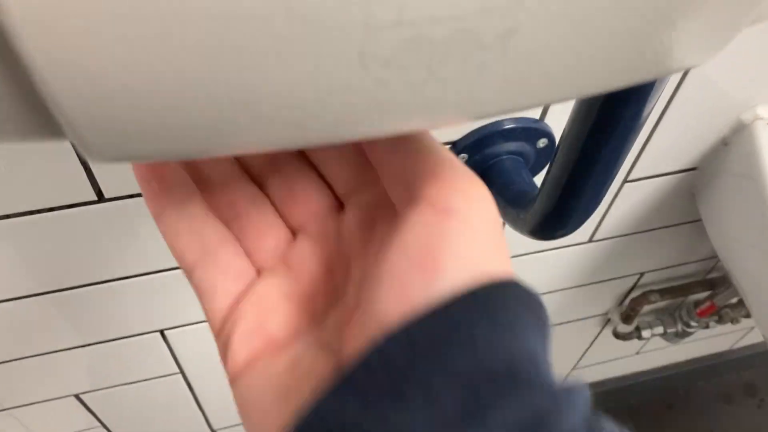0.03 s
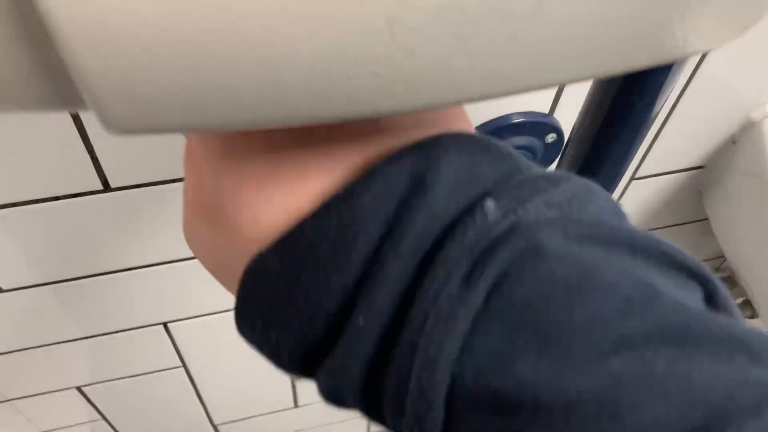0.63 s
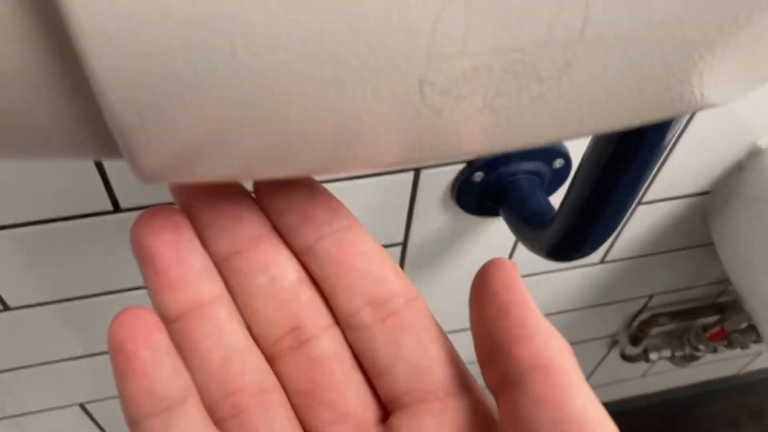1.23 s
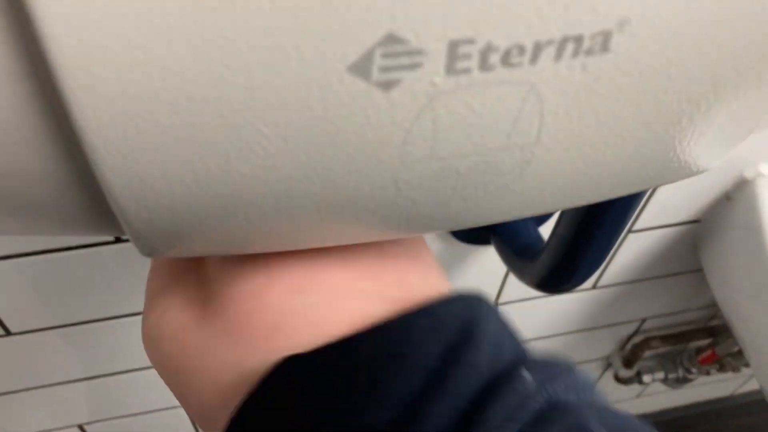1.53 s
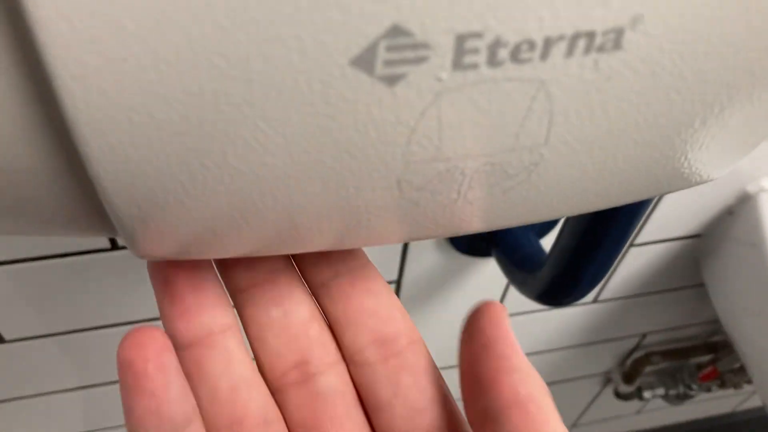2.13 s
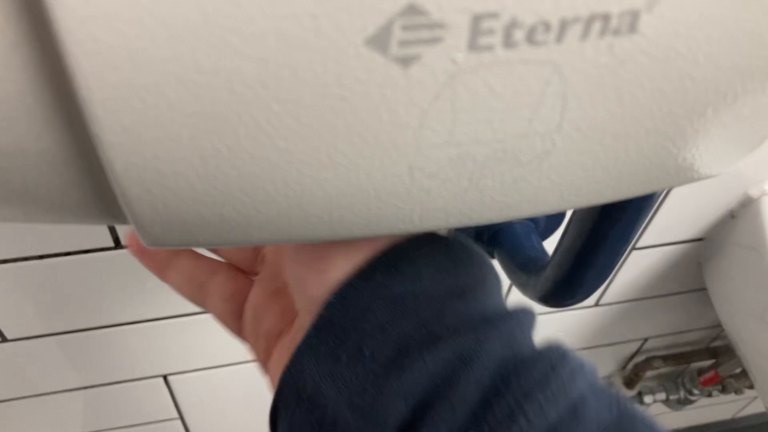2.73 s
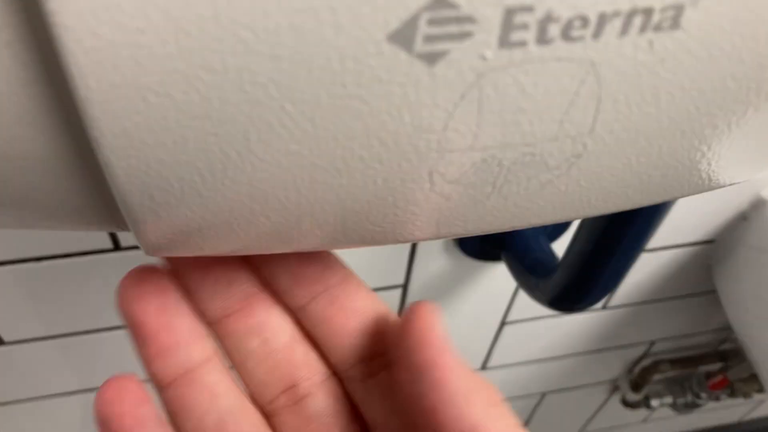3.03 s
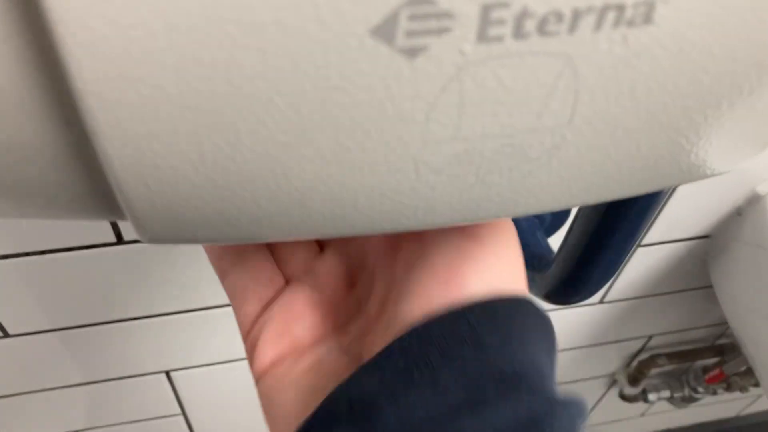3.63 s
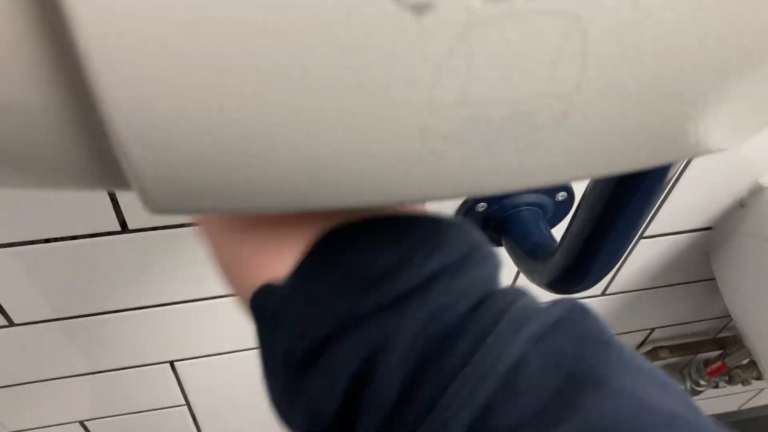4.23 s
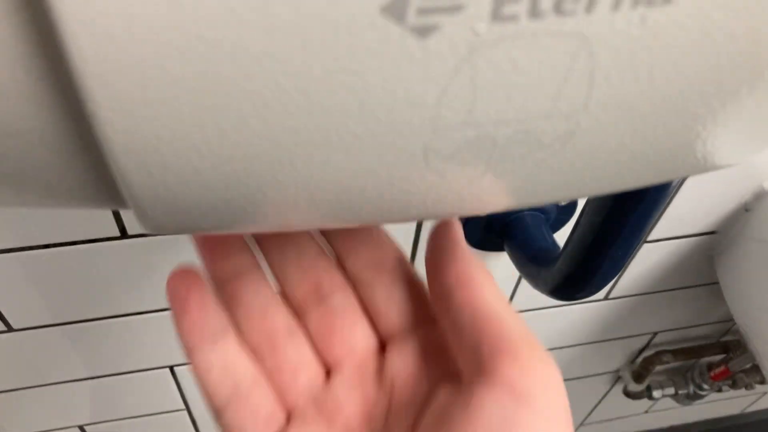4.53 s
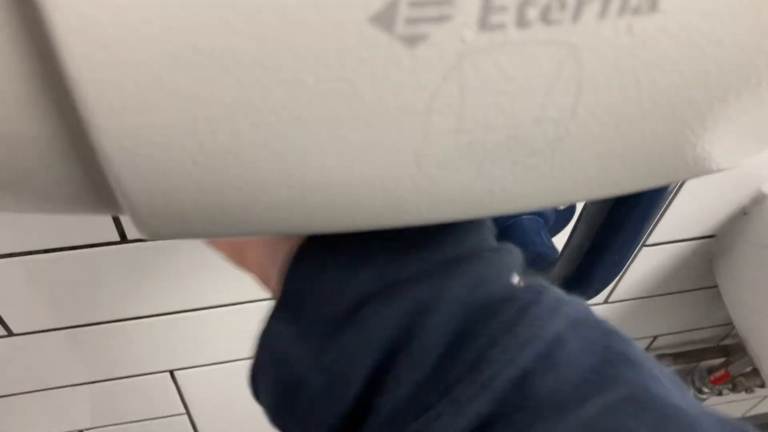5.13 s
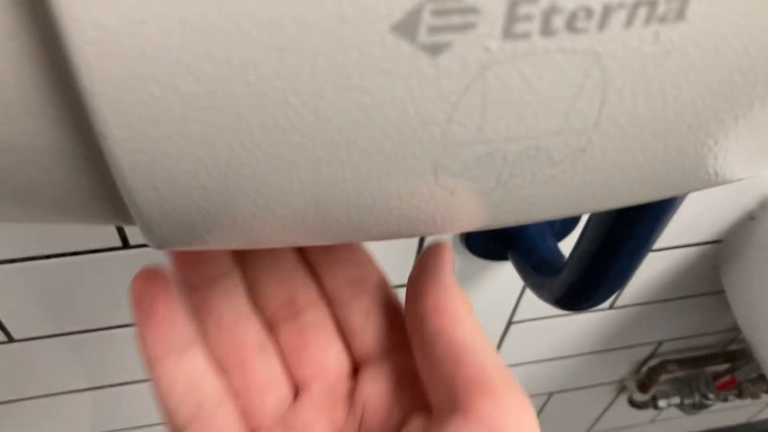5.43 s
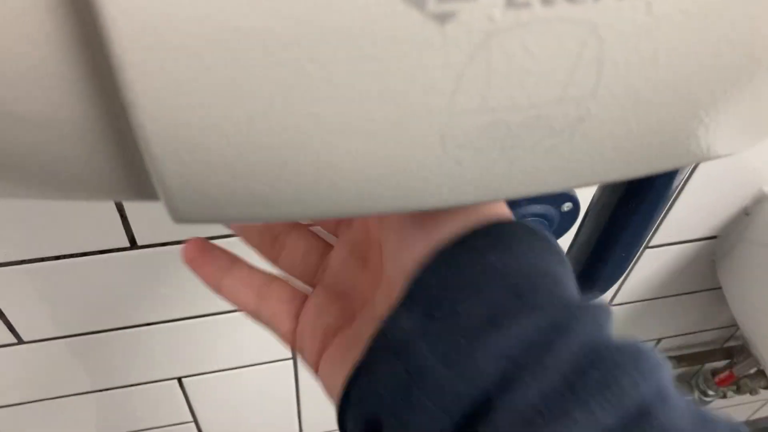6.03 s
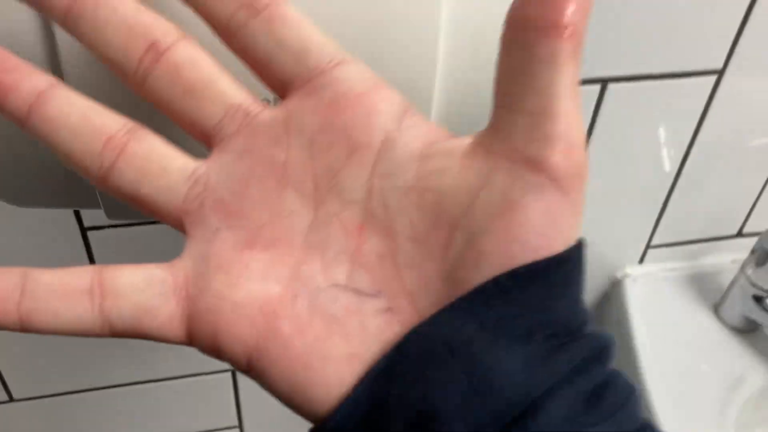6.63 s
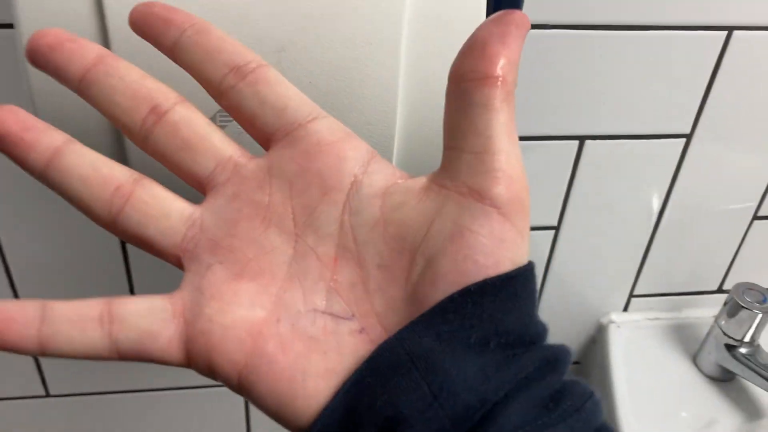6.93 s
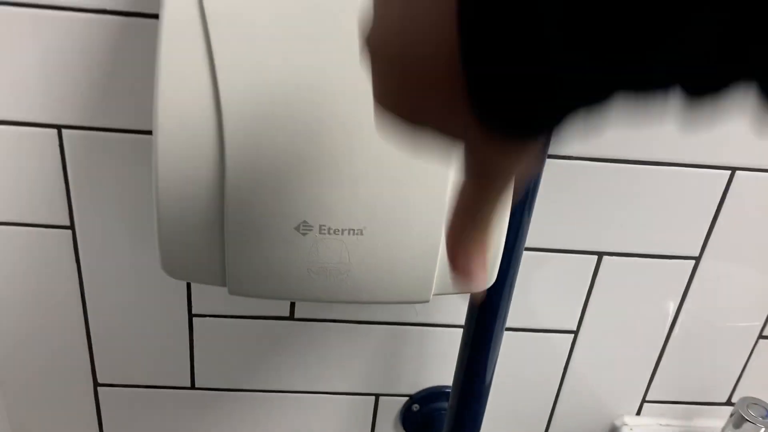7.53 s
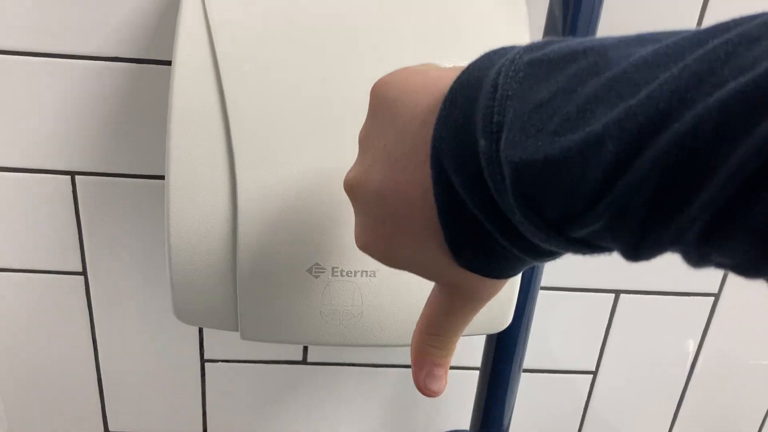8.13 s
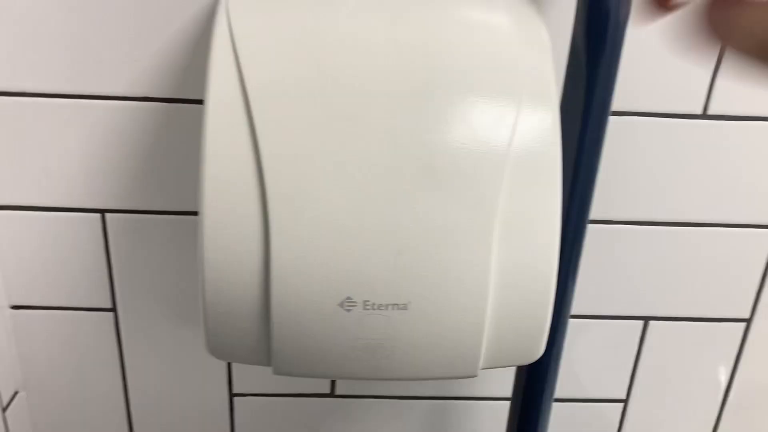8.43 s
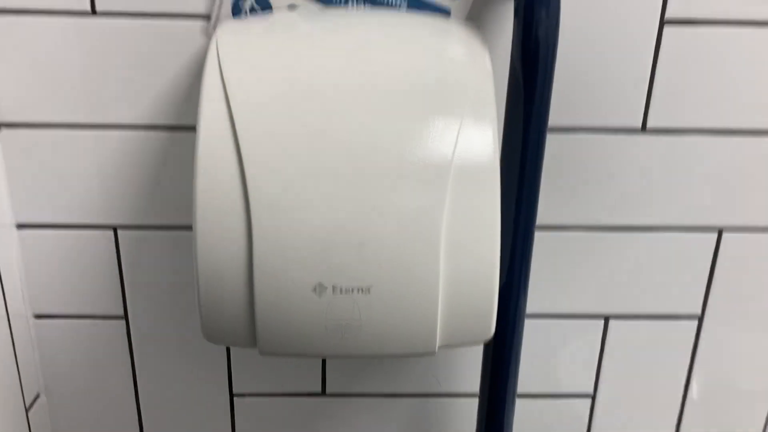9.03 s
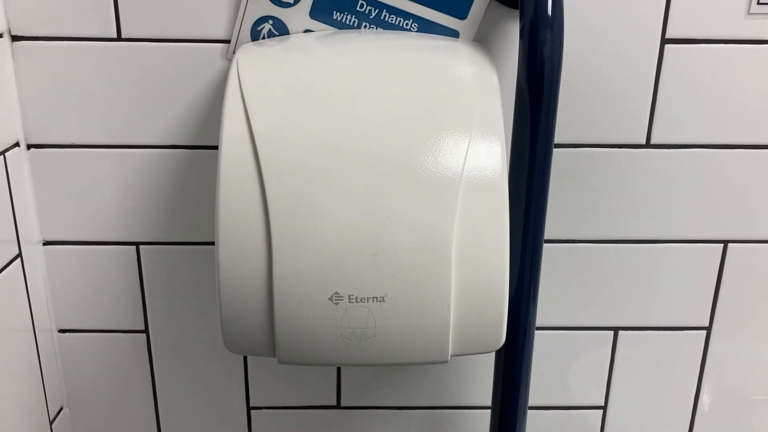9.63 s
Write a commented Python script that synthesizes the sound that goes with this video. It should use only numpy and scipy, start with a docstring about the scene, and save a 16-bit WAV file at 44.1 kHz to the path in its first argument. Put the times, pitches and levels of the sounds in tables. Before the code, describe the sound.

A wall-mounted hand dryer blows loudly right by the microphone, with turbulent air on skin, a fluctuating high whine, a few low wind buffets and one short whistle. The airflow steadies as the hands pull away, then the motor switches off and fades fast. The small tiled washroom is left quiet, with an extractor fan humming, cloth brushing softly and a single hollow tap.

```python
"""A wall-mounted hand dryer blows on a pair of hands in a small tiled washroom, close up.
Turbulent air roars on the skin, rings in the duct and hisses at the nozzle; it buffets the microphone
and once whistles between the fingers. The motor's whine ducks and rises in pitch under a covering hand.
The dryer cuts out and runs down, leaving a ventilation hum, a rustling sleeve and one small knock."""
import sys
import numpy as np
from scipy import signal
from scipy.fft import rfft, irfft, next_fast_len
from scipy.io import wavfile
from scipy.ndimage import uniform_filter1d, map_coordinates

SR = 44100
rng = np.random.default_rng(int(sys.argv[2]) if len(sys.argv) > 2 else 0)


def to_wav(s):
    """Save 16-bit WAV."""
    ch = np.atleast_2d(s).T  # columns
    pcm = np.round(np.clip(ch, -1, 1) * 32767)  # PCM
    wavfile.write(sys.argv[1], SR, pcm.astype(np.int16))


N = 436590
TIME = np.arange(N) / SR
SIDES = np.array([[1], [-1]])  # left port, right port

HANDS_OUT_S, WITHDRAW_S = 6.22, 0.58  # hands and microphone draw back: start, time taken
OFF_S = 7.25
COAST_S = np.maximum(TIME - OFF_S, 0)  # time since the dryer cut out
MAINS_HZ = 50


def jet():
    """Turbulent air roars on the hands, rushes in the duct, hisses at the nozzle and dies with the fan."""
    # the roar of the air swells briefly and unevenly: (time [s], lift [dB], half length [s])
    swells = [(0.136, 2, 0.044), (0.42, 6, 0.055), (0.696, 5, 0.055), (1.02, 3.5, 0.088),
              (1.421, 3.5, 0.17), (1.63, 6.5, 0.046), (1.986, 4.5, 0.035), (2.371, 2, 0.059),
              (2.74, 2.5, 0.057), (2.93, 2.5, 0.16), (3.378, 4, 0.05), (3.79, 5, 0.061), (4.19, 4.5, 0.045),
              (4.537, 5.5, 0.06), (4.75, 1, 0.15), (5.293, 3.5, 0.071), (5.5, 5, 0.066), (5.796, 4, 0.09),
              (6.11, 3.5, 0.049)]
    # skin grazes the air at the nozzle and the hiss flares: (time [s], lift [dB], half length [s])
    grazes = [(0.096, 3.5, .018), (0.16, 2, 0.038), (.32, 1.5, .035), (0.39, 2.5, 0.018), (.6, 1, .03),
              (0.993, 1.5, 0.03), (1.065, 5, 0.028), (1.396, 4.5, 0.032), (1.999, 2, 0.068),
              (2.292, 2, .03), (2.846, 2, 0.032), (2.934, 3, 0.051), (3.144, 2.5, 0.017), (3.883, 1, 0.12),
              (4.559, 3, 0.032), (4.849, 2.5, 0.013), (5.448, 1.5, 0.08), (5.621, 2.5, 0.017),
              (6.083, 1, .09)]
    # low body of the air on the hands: (frequency [Hz], relative level [dB])
    roar_colour = [(20, -53), (35, -32.5), (48, -21), (70, -21), (120, -9), (180, -3), (280, -0.5),
                   (370, -3), (480, -8.5), (620, -17), (900, -36), (2000, -70)]
    # broad mids of the air in the duct: (frequency [Hz], relative level [dB])
    rush_colour = [(250, -43), (500, -2), (630, -3), (740, 1.5), (870, 0), (1150, 0.5), (1400, -1.5),
                   (2000, -4.5), (2700, -2.5), (3500, -6), (4500, -4.5), (5400, -8.5), (6500, -14),
                   (10000, -72)]
    # bright top of the air at the nozzle: (frequency [Hz], relative level [dB])
    hiss_colour = [(2000, -34), (4500, -18), (5500, -6.5), (6200, -2.5), (6800, 0.5), (7500, -.5),
                   (8200, -5.5), (9000, -11), (9700, -16), (12000, -14.5), (13200, -15), (15700, -19)]
    # the band the jet gains once it blows freely: (frequency [Hz], relative level [dB])
    free_colour = [(800, -34), (980, 7), (1300, 5), (1750, -4), (2200, -22), (4000, -40)]
    swell_db = sum(db * swell(s, half) for s, db, half in swells)
    graze_db = sum(db * swell(s, half) for s, db, half in grazes)
    away = ramp(HANDS_OUT_S, WITHDRAW_S)
    eddies = wobble(22)
    run_down_db = 52 * COAST_S
    roar_db = -29.5 + swell_db - 0.5 * away - run_down_db + 1.1 * eddies
    rush_db = -26.5 + 0.15 * swell_db + 0.26 * graze_db - 0.5 * away - run_down_db + 0.94 * eddies
    hiss_db = -29.5 + graze_db - 2 * away - 50 * COAST_S + 0.7 * wobble(24)
    roar = amp(roar_db) * duct(air(roar_colour, near=True, ripple_db=0.04))
    rush = amp(rush_db) * duct(air(rush_colour, near=True, ripple_db=1.2))
    hiss = amp(hiss_db) * air(hiss_colour, near=True, ripple_db=1.2)
    dull_hz, dull_s = 10000, 0.27  # slowing air loses its highest fizz
    dull = filtered(hiss, lambda hz: 1 / np.hypot(1, (hz / dull_hz) ** 4))
    hiss = dull + (hiss - dull) * np.exp(-COAST_S / dull_s)
    free = away * amp(-35.5 - run_down_db) * air(free_colour, ripple_db=2.2)
    sink_db_per_s = 0.21
    return amp(-sink_db_per_s * TIME) * (roar + rush + hiss + free)


def duct(x):
    """Air rings in the dryer's duct, mid rms 1; each resonance swells and bends as the flow shifts."""
    # resonances of duct and casing: (frequency [Hz], width [Hz], lift [dB])
    resonances = [(103, 9.2, 6), (150, 11, 3), (207.8, 11.5, 6), (254, 11, 1.5), (304.7, 14.5, 8),
                  (334.4, 14, 9.5), (420, 11, -6.5), (446.3, 13.4, 11), (527, 20, 2.5), (685, 8.2, 2),
                  (694, 13, 6.5), (758, 19, 10.5), (795, 23, 8), (961, 23, 9), (996, 12, 4), (1083, 20, 6),
                  (1110, 20, 3.5), (1146, 24, 4.5), (1280, 18, 4.5), (1400, 20, 0.5), (1560, 32, 2.5),
                  (1767, 47, 4), (2850, 15, 3)]
    swell_share, bend_share, fade_s = 0.17, 0.002, 0.4
    hz, t, spectra = signal.stft(x, SR, nperseg=8192)
    swells, bends = np.sqrt(3) * uniform_filter1d(rng.standard_normal((2, len(resonances), len(t))), 3)
    # the peaks soften as the microphone draws back and flatten once the flow stops
    near = 1 - 0.35 * np.interp(t, TIME, ramp(HANDS_OUT_S, WITHDRAW_S))
    depth = near * np.exp(-np.maximum(t - OFF_S, 0) / fade_s)
    moving = [(centre * (1 + bend_share * bend), width, db * depth * (1 + swell_share * grow))
              for (centre, width, db), grow, bend in zip(resonances, swells, bends)]
    rung = signal.istft(spectra * amp(lift_db(moving, hz[:, None])), SR)[1][:, :N]
    return rung / np.std(rung.mean(axis=0))


def motor():
    """A whine with torque-ripple sidebands; a covering hand muffles it and raises its pitch."""
    # the hands uncover the outlet and the whine cuts through: (start [s], end [s], lift [dB])
    openings = [(0.039, 0.354, 8), (0.403, .49, 9.5), (0.552, 0.666, 9.5), (0.755, 0.942, 4),
                (1.119, 1.283, 7), (2.416, 2.502, 3), (2.95, 3.013, 11.5), (3.009, 3.294, 8.5),
                (3.569, 3.677, 10.5), (3.686, 4.117, 9), (4.401, 4.605, 6.5), (4.602, 4.749, 10),
                (4.756, 5.143, 7), (5.337, 5.44, 6), (5.631, 5.857, 10), (5.85, 6.197, 7), (6.241, 6.33, 6),
                (6.332, 6.736, 0.5), (6.742, 7.002, 2), (6.997, 7.146, 8)]
    # weaker motor tones: (ratio to the whine's pitch, level [dB])
    partials = [(.837, -55), (1.252, -48), (1.457, -53), (1.502, -50), (1.622, -54), (1.666, -55),
                (1.75, -49.5), (2.58, -54)]
    uncover_s, sweep_s, inertia_s = 0.034, 0.18, 0.2174
    free_hz, sag_hz_per_s, covered_rise_hz = 2606, 1.7, 14
    braking_per_s, fall_db_per_s = 0.43, 150  # after the cut
    gates = np.array([ramp(start - uncover_s / 2, uncover_s) - ramp(end - uncover_s / 2, uncover_s)
                      for start, end, db in openings])
    open_db = np.array(openings)[:, 2] @ gates
    covered = np.clip(1 - gates.sum(axis=0), 0, 1) * (TIME < HANDS_OUT_S)
    soft_cover = uniform_filter1d(covered, int(sweep_s * SR))
    sweep_db = 3.5 * np.sin(np.pi * soft_cover)  # peaks as a hand sweeps across the outlet
    # a covered outlet unloads the fan, which speeds up with a lag
    step = 1 / (inertia_s * SR)
    unloaded = 1 - signal.lfilter([step], [1, step - 1], 1 - covered)
    hz = free_hz - sag_hz_per_s * TIME + covered_rise_hz * unloaded
    blade = turning((hz + 2.4 * wobble(25)) / (1 + braking_per_s * COAST_S))
    ripple = 2 * np.pi * 2 * MAINS_HZ * TIME
    away_db = 6 * ramp(HANDS_OUT_S, WITHDRAW_S)
    lower = shaken(-40.5 + 0.31 * open_db + sweep_db - away_db, blade - ripple, flutter_db=2.8)
    upper = shaken(-45 + 0.7 * open_db - away_db, blade + ripple, flutter_db=2.8)
    # sidebands of opposite sign swing the pitch
    whine = shaken(-39.5 + open_db, blade, flutter_db=2.2) + lower - upper
    overtones = sum(reflected(db - away_db, ratio * blade, lead_rad=0) for ratio, db in partials)
    deflected = soft_cover * reflected(-38.5, blade, lead_rad=2.6)  # thrown sideways by a covering hand
    gain = np.sqrt(2) * amp(-fall_db_per_s * COAST_S)
    direct = from_nozzle(gain * whine, lead_ms=0.12, left_db=7.5, wet_db=-19.5)
    return direct + gain * (overtones + deflected)


def shaken(db, phase, flutter_db):
    """A tone crosses turbulent air, which shakes its level and phase."""
    return amp(db + flutter_db * wobble(30)) * np.sin(phase + 0.25 * wobble(36))


def reflected(db, phase, lead_rad):
    """A tone bounces off the tiles; as the arm moves, its level and phase drift at each port."""
    drift_db, drift_rad = 2.2, 0.28
    return np.array([amp(db + drift_db * wobble(14))
                     * np.sin(phase + side * lead_rad / 2 + drift_rad * wobble(14)) for side in (1, -1)])


def whistles():
    """Air whistles between the fingers, trembling with the motor's ripple, and later on the open nozzle."""
    # air across the fingers: (time [s], pitch [Hz], level [dB])
    finger_notes = [(1.58, 2490, -60.5), (1.63, 2540, -32), (1.68, 2560, -18), (1.72, 2583, -28),
                    (1.78, 2576, -27.5), (1.84, 2560, -22), (1.89, 2544, -19), (1.92, 2560, -36),
                    (1.95, 2500, -62)]
    # the open nozzle sings faintly: (time [s], pitch [Hz], level [dB])
    nozzle_notes = [(6.15, 4350, -81), (6.28, 4335, -34), (6.5, 4330, -48), (6.8, 4320, -45),
                    (7.1, 4330, -39), (7.3, 4370, -68)]
    tremble = 1 + 0.12 * np.sin(2 * np.pi * 2 * MAINS_HZ * TIME) + 0.11 * wobble(120)
    chirp = tremble * edge_tone(finger_notes, flutter_hz=4.1)
    fingers = from_nozzle(chirp, lead_ms=0.3, left_db=10, wet_db=-16)
    return fingers + washroom(edge_tone(nozzle_notes, flutter_hz=6.85), wet_db=-16)


def edge_tone(notes, flutter_hz):
    """A gliding whistle whose pitch flutters in the turbulence."""
    times, pitches, levels = np.transpose(notes)
    hz = np.interp(TIME, times, pitches) + flutter_hz * wobble(70)
    sounding = (TIME > times[0]) & (TIME < times[-1])
    return sounding * amp(np.interp(TIME, times, levels)) * np.sin(turning(hz))


def buffets():
    """Air thrown off the hands flutters on the microphone, with a thump when the jet brushes it."""
    # the jet brushes the microphone: (time [s], level [dB], half length [s])
    gusts = [(0.239, -21, 0.011), (1.127, -31, 0.029), (2.072, -36, 0.037), (2.95, -45.5, 0.038),
             (3.876, -31, 0.029), (4.718, -44, 0.045)]
    # wind rumble: (frequency [Hz], relative level [dB])
    rumble_colour = [(15, -27), (30, -17), (48, -1.5), (100, 5), (170, -7.5), (300, -27), (800, -72)]
    flutter = amp(-41.5 + 0.54 * wobble(9.9)) * np.clip((HANDS_OUT_S - TIME) / 0.04, 0, 1)
    thumps = sum(amp(db) * swell(s, half) for s, db, half in gusts)
    return np.hypot(flutter, thumps) * air(rumble_colour)


def knock():
    """One soft, hollow tap: a fast-damped tone with a little room on it."""
    # the tap: (time [s], level [dB], pitch [Hz], t60 [s])
    taps = [(8.804, -21.5, 638, 0.014)]
    s, db, hz, t60 = taps[0]
    attack_s = 0.0019
    age = np.maximum(TIME - s, 0)
    envelope = amp(db - 60 * age / t60) * (1 - np.exp(-age / attack_s))
    return washroom(envelope * np.sin(2 * np.pi * hz * age), wet_db=-9)


def sleeve():
    """Cloth rubs in soft, uneven strokes as the arm moves away: a broad swish and a narrower scuff."""
    # strokes of the sleeve: (time [s], half length [s], swish level [dB], scuff level [dB])
    strokes = [(7.885, 0.17, -54.5, -63), (8.163, 0.11, -58, -65), (9.045, 0.057, -63, -61.5),
               (9.255, 0.056, -63, -72), (9.713, 0.049, -58.5, -60.5), (9.823, 0.059, -63, -62.5)]
    # airy swish of the fabric: (frequency [Hz], relative level [dB])
    swish_colour = [(300, 0), (900, -4), (1500, 0), (2150, -12), (3000, -6.5), (4400, -8.5), (5400, -10.5),
                    (7000, -8), (8200, -13), (10000, -37), (15700, -40.5)]
    # scuff of cloth on cloth: (frequency [Hz], relative level [dB])
    scuff_colour = [(700, -30), (1450, -11), (1750, 3), (2150, 8), (2900, -7), (5000, -14), (10000, -49)]
    swish = sum(amp(db) * swell(s, half) for s, half, db, _ in strokes)
    scuff = sum(amp(db) * swell(s, half) for s, half, _, db in strokes)
    grain = amp(1.5 * wobble(45))
    return grain * (swish * air(swish_colour, ripple_db=4) + scuff * air(scuff_colour, ripple_db=5))


def ventilation():
    """An extractor fan lays the bed: wavering low tones over dull air noise that rings in its duct."""
    # the extractor's hum: (pitch [Hz], level [dB], waver [dB])
    tones = [(43.6, -57, 0), (81.9, -49.5, 3), (99, -63, 6.5), (116.3, -61, 1), (153, -61.5, 1),
             (171, -56, 1.5), (233, -58, 3), (300, -65.5, 0.5), (330, -68.5, 3.5), (401, -63.5, 8),
             (443, -71.5, 4), (608, -69.5, 1.5), (846, -72, 2)]
    # its air noise: (frequency [Hz], relative level [dB])
    draught_colour = [(15, -35.5), (25, -10), (45, 3), (70, -3), (168, -5.5), (279, -9.5), (401, -9),
                      (733, -16), (1000, -17.5), (1300, -21), (2200, -26.5), (3500, -27.5), (5400, -35),
                      (7000, -30.5), (8000, -36), (10400, -71), (15700, -52)]
    # resonances of its duct: (frequency [Hz], width [Hz], lift [dB])
    resonances = [(151.8, 12, 3), (171.3, 9.8, 3), (198, 22, -2), (235, 32, 8), (330, 30, 4), (360, 22, -5),
                  (391, 17, 8.5), (616, 43, 6.5), (825, 64, 8.5), (895, 40, -7.5), (945, 25, 4),
                  (1120, 70, 4), (1230, 70, 5.5), (1380, 60, 4.5), (2187, 300, 5.5)]
    # stereo likeness of sound from across the room: (frequency [Hz], coherence)
    room_alike = [(60, 0.88), (150, 0.96), (380, 0.33), (950, 0.16), (2380, -0.07), (5980, 1),
                  (15000, 0.71)]
    # its left-right phase: (frequency [Hz], left lead [rad])
    room_lead = [(400, 0), (1800, -2.5), (6400, -4.5), (8800, -14)]
    hum = sum(amp(db + waver_db * wobble(5)) * np.sin(turning(hz + 1.65 * wobble(8)))
              for hz, db, waver_db in tones)
    draught = air(draught_colour, ripple_db=2.5, alike=room_alike, lead=room_lead)
    return hum + amp(-52.5) * filtered(draught, lambda hz: amp(lift_db(resonances, hz)))


def air(colour, near=False, ripple_db=0, alike=None, lead=None):
    """Stereo noise, mid rms 1, rippled by standing waves between the tiles; near, it favours one port."""
    # left-right likeness of the air noise: (frequency [Hz], coherence)
    stereo_alike = [(60, .95), (330, 0.83), (520, 0.55), (1000, 0.22), (3500, 0.28), (4800, .2),
                    (5600, 0.55), (6200, .7), (6600, .96), (7500, .96), (8100, .8), (8700, .99),
                    (16000, .97)]
    # its left-right phase, which sets how wide the hiss sounds: (frequency [Hz], left lead [rad])
    stereo_lead = [(100, 0.4), (450, -0.1), (1200, 3), (2300, 6.5), (3500, 9.5), (4500, 12), (5100, 9.4),
                   (5900, 8.2), (6450, 6.4), (7400, 6.1), (8600, 3.2), (9400, 3.1), (9900, 0.2),
                   (11800, -0.1), (13300, -3.1), (14200, -3.2), (15100, -6.2)]
    # pan of a near source: (frequency [Hz], left minus right [dB])
    balance = [(60, -1), (150, 3.5), (300, 0.5), (1000, 2.8), (2500, 2), (4000, 2.5), (5600, 2.5),
               (6600, 0)]
    size = next_fast_len(N)
    hz = np.fft.rfftfreq(size, 1 / SR)
    common, apart = rng.standard_normal((2, 2 * len(hz))).view(complex)
    spread = np.arccos(np.clip(along(alike or stereo_alike, hz), 0, 1)) / 2
    stereo = np.cos(spread) * common + SIDES * np.sin(spread) * apart
    stereo = stereo * np.exp(0.5j * SIDES * along(lead or stereo_lead, hz))
    standing = np.interp(hz / 20, np.arange(SR // 20), rng.standard_normal(SR // 20))
    colour_db = along(colour, hz) + ripple_db * standing
    if near:
        colour_db = colour_db + SIDES * along(balance, hz) / 2
    noise = irfft(stereo * amp(colour_db), size)[:, :N]
    return noise / np.std(noise.mean(axis=0))


def from_nozzle(x, lead_ms, left_db, wet_db):
    """A tone from the nozzle rings in the room and reaches the left port sooner and louder."""
    panned = amp(SIDES * left_db / 2) * washroom(x, wet_db)
    return filtered(panned, lambda hz: np.exp(1j * np.pi * SIDES * hz * lead_ms / 1000))


def washroom(x, wet_db):
    """A source and its short reverb off the tiles, different at each port."""
    # decay of the tiled room: (frequency [Hz], t60 [s])
    decay = [(100, 0.41), (1000, 0.3), (4000, 0.51), (12000, 0.035)]
    hz, t, spectra = signal.stft(rng.standard_normal((2, SR // 2)), SR, nperseg=256)
    tail = signal.istft(spectra * amp(-60 * t / along(decay, hz)[:, None]), SR, nperseg=256)[1]
    reverb = signal.fftconvolve(x[None], tail / np.linalg.norm(tail[0]), axes=1)[:, :N]
    return x + amp(wet_db) * reverb


def lift_db(resonances, hz):
    """The peaks and dips that a duct's resonances give to air noise."""
    return sum(db / (1 + (2 * (hz - centre) / width) ** 2) for centre, width, db in resonances)


def filtered(x, response):
    """x through a filter given as a function of frequency."""
    size = next_fast_len(N + SR // 4)
    return irfft(rfft(x, size) * response(np.fft.rfftfreq(size, 1 / SR)), size)[..., :N]


def swell(s, half_length):
    """A bell-shaped rise and fall around time s, top 1."""
    bell = np.zeros(N)
    span = slice(*np.searchsorted(TIME, [s - 5 * half_length, s + 5 * half_length]))
    bell[span] = np.exp(-0.5 * ((TIME[span] - s) / half_length) ** 2)
    return bell


def ramp(s, length):
    """A straight rise from 0 to 1 that starts at time s."""
    return np.clip((TIME - s) / length, 0, 1)


def wobble(rate):
    """A smooth random curve, rate knots a second."""
    knots = rng.standard_normal(int(N * rate / SR) + 4)
    coarse = TIME[::SR // 1000]
    return np.interp(TIME, coarse, map_coordinates(knots, [coarse * rate]))


def turning(hz):
    """The running phase of a changing frequency."""
    return 2 * np.pi * np.cumsum(hz) / SR


def along(points, hz):
    """(frequency, value) points read on a log axis."""
    freqs, values = np.transpose(points)
    return np.interp(np.log1p(hz), np.log1p(freqs), values)


def amp(db):
    """Decibels to gain."""
    return 10 ** (np.asarray(db) / 20)


def scene():
    """The dryer and the quiet room behind it."""
    return jet() + motor() + whistles() + buffets() + ventilation() + sleeve() + knock()


def record(dry):
    """The microphone loses the deepest bass, and a steep high cut takes off the very top."""
    bass_hz, top_hz = 31, 15750
    return filtered(dry, lambda hz: hz ** 4 / np.hypot(hz ** 4, bass_hz ** 4)
                    / np.hypot(1, (hz / top_hz) ** 150))


dry = scene()
out = record(dry)
to_wav(out)
```